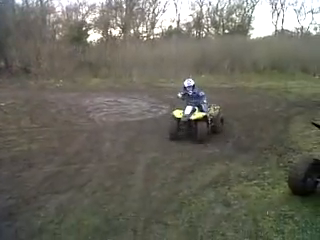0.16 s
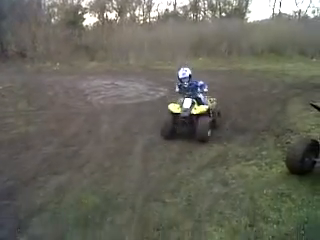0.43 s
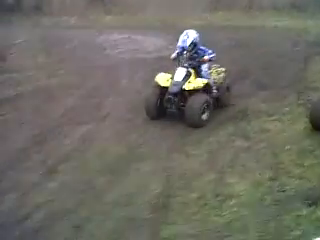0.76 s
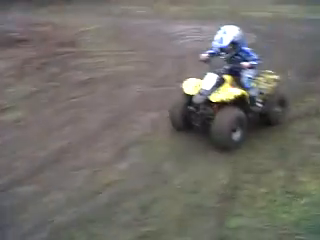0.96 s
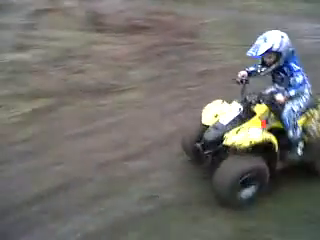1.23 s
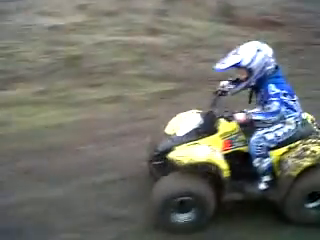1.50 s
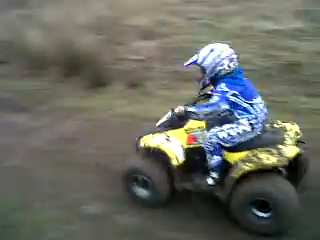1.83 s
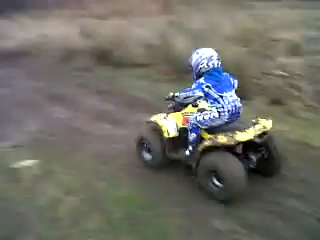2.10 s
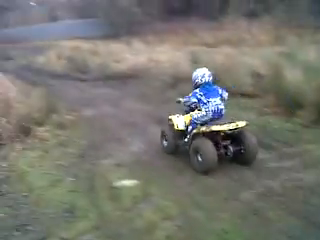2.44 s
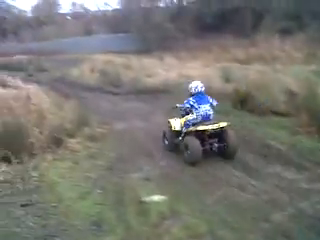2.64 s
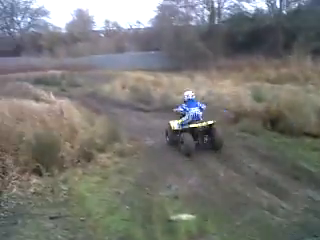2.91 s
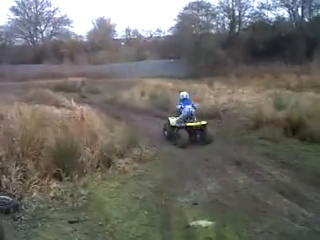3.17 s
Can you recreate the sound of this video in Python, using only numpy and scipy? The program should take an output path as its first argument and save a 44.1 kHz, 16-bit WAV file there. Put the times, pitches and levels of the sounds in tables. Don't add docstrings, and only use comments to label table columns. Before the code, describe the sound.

Outdoors, a small two-stroke quad engine drones nearer, peaks around the middle with clacks from the frame, then thins and recedes, while a parked engine idles faintly nearby; handheld camera microphone with muffled treble.

```python
import sys
import numpy as np
from scipy import signal
from scipy.fft import rfft, irfft
from scipy.io import wavfile
from scipy.ndimage import uniform_filter1d

SR = 44100
rng = np.random.default_rng(int(sys.argv[2]) if len(sys.argv) > 2 else 0)


def amplitude_ratio(level_db):
    exponent = np.asarray(level_db, float) / 20
    return 10 ** exponent


def to_wav(sig):
    pcm = np.clip(np.atleast_2d(sig), -1, 1) * 32767
    pcm = np.round(pcm).astype(np.int16)
    wavfile.write(sys.argv[1], SR, pcm.T)


N = 147735

# t/s, firing f/Hz, intake boom level/dB, nearness level/dB
RIDE = [(0.0, 115, -27.5, -39), (0.2, 109, -27.5, -38.5), (0.75, 100, -25, -37.5),
        (1.29, 102.5, -19.5, -32.5), (1.33, 99.45, -19.5, -32.5), (1.51, 103.1, -19.5, -30.5),
        (1.72, 100.1, -21.5, -31.5), (1.85, 102.8, -22.5, -30.5), (2.01, 102.3, -25.5, -30),
        (2.21, 105.1, -26.5, -30), (2.26, 103.6, -30.5, -31.5), (2.62, 107.2, -36, -34),
        (2.77, 104.5, -37.5, -34.5), (2.89, 109.2, -35, -34), (3.04, 105.3, -39, -34.5),
        (3.15, 110.8, -33, -36), (3.22, 107.6, -33, -36.5), (3.35, 114.5, -32.5, -38.5)]
VIEW_TIMES = (0.749, 1.4, 1.9, 2.3, 2.751)

# multiple of the firing rate [1], level/dB
FRONT_TONES = [(1, -13), (2, 0), (3, -15.5), (4, -38), (5, -14), (6, -14.5), (7, -17.5), (8, -25),
               (9, -22.5), (10, -21.5), (11, -27.5), (12, -39), (13, -17), (14, -30)]
QUARTER_TONES = [(1, -13.5), (2, 0), (3, -18.5), (4, -26), (5, -19.5), (6, -15), (7, -14), (8, -28),
                 (9, -22.5), (10, -18), (11, -14.5), (12, -26.5), (13, -22), (14, -26)]
SIDE_TONES = [(1, -7.5), (2, 0), (3, -13), (4, -25), (5, -9.5), (6, -11.5), (7, -10.5), (8, -14.5),
              (9, -18), (10, -10.5), (11, -6.5), (12, -12.5), (13, -21.5), (14, -14.5)]
TAIL_TONES = [(1, -3.5), (2, 0), (3, -4), (4, -17), (5, -8), (6, -3.5), (7, -13.5), (8, -17), (9, -12.5),
              (10, -2.5), (11, -5.5), (12, -24), (13, -19), (14, -12.5)]
REAR_TONES = [(1, 2.5), (2, 0), (3, -2), (4, -19.5), (5, -11.5), (6, -9.5), (7, -13), (8, -12), (9, -14),
              (10, -5.5), (11, -26.5), (12, -25.5), (13, -14), (14, -11)]
TONES_DB = (10.5, 10, 5.5, 1.5, -3)
CRACK_DB = (-16.5, -13.5, -12.5, -15, -16.5)

# multiple of the tooth meshing rate [1], then level/dB for each of the five views
GEARS = [(3, -20, -20, -20, -20, -21), (4, -14, -16, -13, -11, -21), (5, -13, -8, -9, -7, -10),
         (6, -11, -6, -6, -7, -12), (10, -21, -24, -27, -27, -27)]
SIDEBAND_DB = (-13, -11, -9.5, -5, -7)

# f/Hz, level/dB (per Hz)
HISS_FRONT = [(400, -10.5), (650, -4.5), (1450, -2), (1780, -9.5), (2350, 1), (2850, -1), (3400, -10),
              (4550, -12.5), (5300, -20)]
HISS_SIDE = [(400, -7.5), (650, -0.5), (1100, -1.5), (1650, -4.5), (2350, -1.5), (2850, 0.5), (3400, -10.5),
             (4300, -11.5), (5500, -16)]
HISS_REAR = [(400, -10.5), (650, -6), (1500, -3.5), (1950, -11), (2350, 1), (2900, -3.5), (3500, -9),
             (4400, -16), (5100, -21.5)]
HISS_DB = (-1.5, -2, -3)

# t/s, f/Hz of the ninth multiple of its slow thump
IDLE = [
    (0.0, 135.2),
    (0.13, 141.2),
    (0.44, 139.4),
    (1.39, 140.2),
    (1.51, 143.4),
    (2.14, 137.2),
    (2.7, 141.2),
    (3.05, 136.4),
    (3.35, 136.7),
]
# multiple of the slow thump [1], level/dB
IDLE_TONES = [(2, -74.5), (3, -62), (4, -58.5), (5, -53), (6, -53), (7, -51), (8, -51.5), (9, -45.5),
              (10, -53), (11, -61.5), (12, -62)]

# t/s, level/dB, f/Hz, rise/s, fall/s
KNOCKS = [
    (1.054, -26, 2320, 0.0012, 0.015),
    (1.547, -23, 1920, 0.00086, 0.0068),
    (1.999, -43.5, 4760, 0.00091, 0.0049),
    (2.18, -26.5, 1920, 0.053, .03),
]


def unit(x):
    return x / np.sqrt(np.mean(x ** 2))


def walk(rate):
    held = np.repeat(rng.standard_normal(int(rate * N / SR) + 2), 8)
    smooth = uniform_filter1d(uniform_filter1d(held, size=8), size=8)
    return 1.3 * np.interp(np.arange(N) * rate * 8 / SR, np.arange(len(smooth)), smooth)


def shape_db(table, hz):
    table = np.array(table)
    return np.interp(np.log(np.maximum(hz, 1)), np.log(table[:, 0]), table[:, 1])


def band(x, lo_hz, hi_hz):
    return signal.sosfilt(signal.butter(2, [lo_hz, hi_hz], "band", fs=SR, output="sos"), x)


def views(t):
    return np.array([np.interp(t, VIEW_TIMES, row) for row in np.eye(len(VIEW_TIMES))])


def tone(turns, wobble_db, rate, slip, scatter=1.):
    level = np.sqrt(2) * amplitude_ratio(wobble_db * walk(rate))
    start = scatter * rng.random()
    return level * np.sin(2 * np.pi * (turns + start) + slip * walk(rate))


def intake_boom(turns, boom_db):
    return amplitude_ratio(boom_db) * tone(2 * turns, 0.42, 15, 0.24)


def exhaust(turns, share):
    tables = (FRONT_TONES, QUARTER_TONES, SIDE_TONES, TAIL_TONES, REAR_TONES)
    levels = np.array([np.array(tones)[:, 1] + db for tones, db in zip(tables, TONES_DB)])
    count = levels.shape[1]
    out = 0
    for k in range(count):
        if k == 1:
            continue
        sine = tone((k + 1) * turns, 1.5 + 0.2 * k, 11, 0.05 * k, 0.46)
        out = out + amplitude_ratio(levels[:, k] @ share) * sine
    colours = (HISS_FRONT, HISS_SIDE, HISS_SIDE, HISS_SIDE, HISS_REAR)
    for k in range(count + 1, 33):
        hz = k * 107.3
        db = [shape_db(colour, hz) - shape_db(colour, 2500.) + crack
              for colour, crack in zip(colours, CRACK_DB)]
        out = out + amplitude_ratio(np.array(db) @ share) * tone(k * turns, 3.8, 9, 0.8)
    return out


def gears(turns, share):
    mesh_per_firing = 4.525
    mesh = mesh_per_firing * (turns + 0.016 * walk(24))
    partner_level = amplitude_ratio(np.array(SIDEBAND_DB) @ share)
    out = 0
    for k, *db in GEARS:
        whine = tone(k * mesh, 3, 16, 0.7)
        partner = tone(k * mesh - turns, 4, 11, 0.8)
        out = out + amplitude_ratio(np.array(db) @ share) * (whine + partner_level * partner)
    return out


def patchy(x, depth_db):
    z = signal.stft(x, nperseg=512)[2]
    across_pitch = uniform_filter1d(rng.standard_normal(z.shape), size=4, axis=0)
    patches = uniform_filter1d(across_pitch, size=9, axis=1)
    return signal.istft(z * amplitude_ratio(depth_db * unit(patches)), nperseg=512)[1][:N]


def hiss(turns, share):
    hz = np.arange(N // 2 + 1) * SR / N
    low_cut = np.minimum(hz / 350, 1) ** 3
    front, quarter, side, tail, rear = share
    weights = (front, quarter + side + tail / 2, tail / 2 + rear)
    out = 0
    for colour, db, weight in zip((HISS_FRONT, HISS_SIDE, HISS_REAR), HISS_DB, weights):
        puff = 0.92 + np.exp(-((turns + 0.3) % 1) / 0.32)
        noise = puff * amplitude_ratio(1.1 * walk(14)) * rng.standard_normal(N)
        gas = irfft(rfft(noise) * amplitude_ratio(shape_db(colour, hz)) * low_cut, N)
        out = out + np.sqrt(weight) * amplitude_ratio(db) * gas / np.std(band(gas, 1900, 3500))
    return patchy(out, 1.5)


def mud_rumble():
    return amplitude_ratio(-9.5 + 1.8 * walk(6)) * unit(band(rng.standard_normal(N), 150, 297))


def idler(t):
    idle = np.array(IDLE)
    turns = np.cumsum(np.interp(t, idle[:, 0], idle[:, 1])) / SR / 9
    out = 0
    for k, db in IDLE_TONES:
        level = np.sqrt(2) * amplitude_ratio(db + 1.1 * walk(2.7))
        out = out + level * np.cos(2 * np.pi * k * turns + 0.28 * walk(4))
    return out


def field_air():
    return amplitude_ratio(-57.5) * unit(band(rng.standard_normal(N), 55, 450))


def knock(t):
    out = 0
    for start, db, hz, rise, fall in KNOCKS:
        swell = np.exp(-np.abs(t - start) / np.where(t < start, rise, fall))
        wide = np.clip((0.004 / fall) ** 2, 0.012, 0.8)
        ring = band(swell * rng.standard_normal(N), hz * (1 - wide / 2), hz * (1 + wide))
        out = out + amplitude_ratio(db) * ring * np.sqrt(SR / 3 / hz / wide)
    return out


def scene():
    t = np.arange(N) / SR
    ride = np.array(RIDE)
    firing_hz, boom_db, near_db = (np.interp(t, ride[:, 0], ride[:, k]) for k in (1, 2, 3))
    turns = np.cumsum(firing_hz * (1 + 0.0042 * walk(15))) / SR
    share = views(t)
    boom = intake_boom(turns, boom_db)
    bike = amplitude_ratio(near_db) * (exhaust(turns, share) + gears(turns, share) + hiss(turns, share) + mud_rumble())
    return (boom + bike + idler(t) + field_air() + knock(t))[None]


def low_pass(x):
    return signal.sosfilt(signal.butter(12, 7200, fs=SR, output="sos"), x)


def record(dry):
    cut = signal.sosfilt(signal.butter(10, 5450, fs=SR, output="sos"), dry)
    return low_pass(cut)


dry = scene()
out = record(dry)
to_wav(out)
```